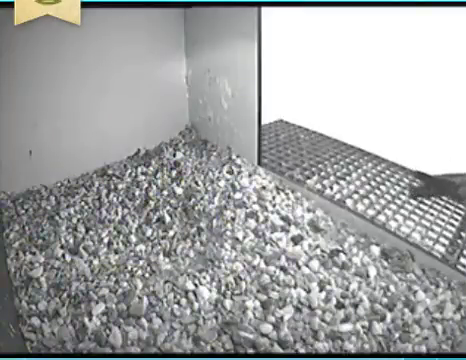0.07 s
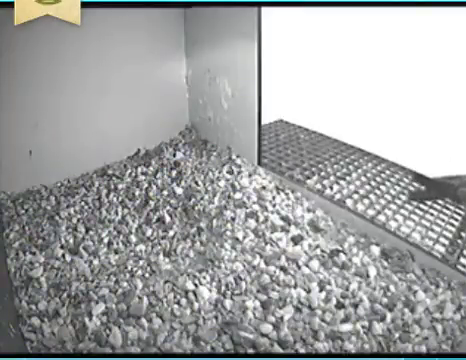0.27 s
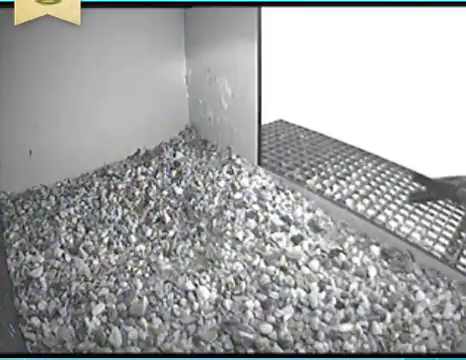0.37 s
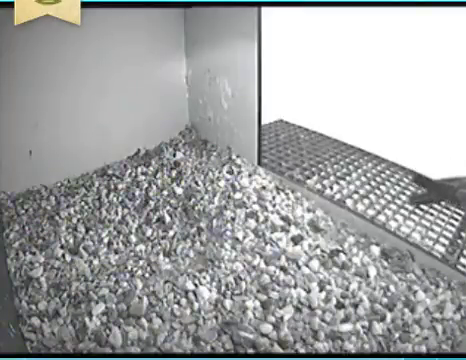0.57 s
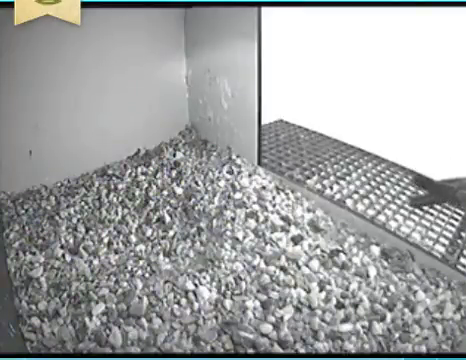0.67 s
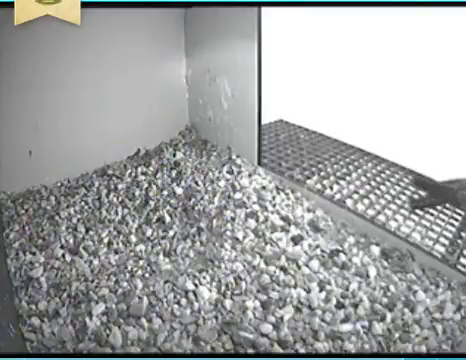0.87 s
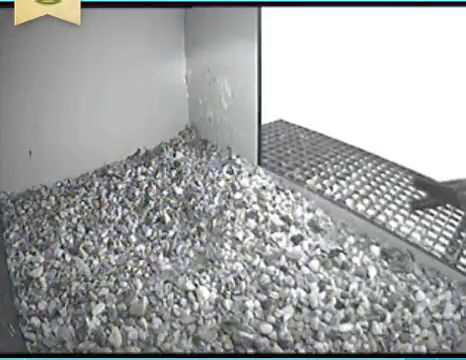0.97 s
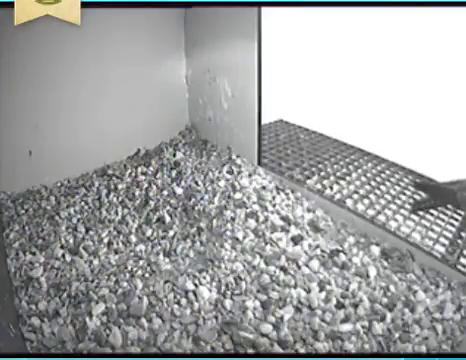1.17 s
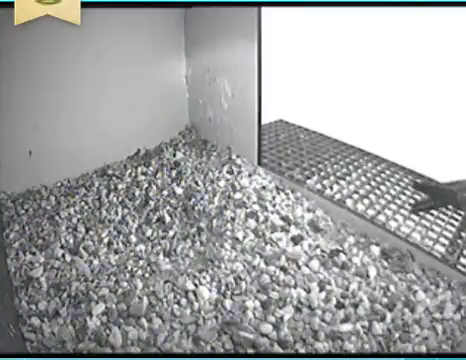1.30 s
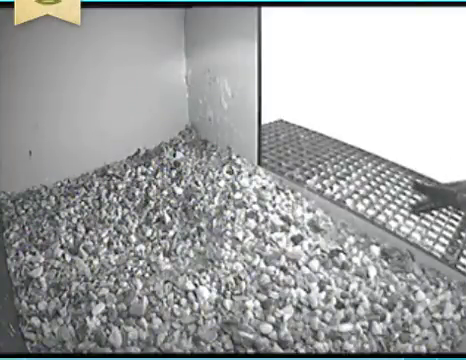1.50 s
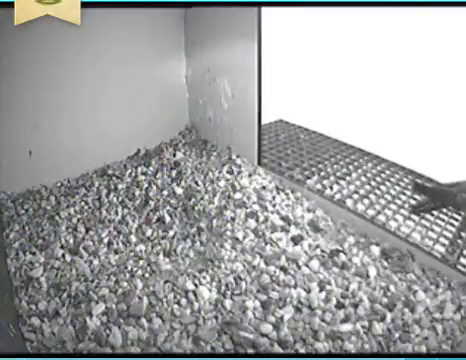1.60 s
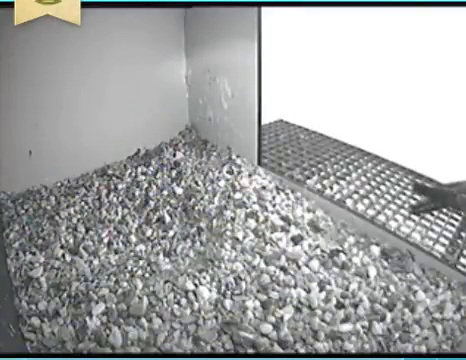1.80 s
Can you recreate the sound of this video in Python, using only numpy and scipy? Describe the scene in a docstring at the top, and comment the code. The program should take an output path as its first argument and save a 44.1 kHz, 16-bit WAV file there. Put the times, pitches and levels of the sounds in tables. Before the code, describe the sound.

A falcon gives one short, harsh cackle in a nest box over faint hum and hiss.

```python
"""A falcon gives one short, harsh cackle in a nest box: a rising squeak, a hoarse catch, then a loud
whistle that breaks downward through its registers and ends in a low cluck. Each register is an
unsteady gliding tone over raspy breath; faint tones linger briefly after the call, longest near
2.2 kHz. A faint outdoor rumble hums in the box's low resonances over an even hiss, and two soft
rustles come near the end."""
import sys
import numpy as np
from scipy import signal
from scipy.fft import rfft, irfft
from scipy.io import wavfile
from scipy.ndimage import uniform_filter1d

SR = 44100
rng = np.random.default_rng(int(sys.argv[2]) if len(sys.argv) > 2 else 0)


def generate_wav(signal):
    """Clip the signal to [-1, 1] and save it as 16-bit WAV at the path in sys.argv[1]."""
    frames = np.transpose(np.atleast_2d(signal))
    scaled = np.clip(frames, -1, 1) * 32767
    pcm = np.round(scaled).astype(np.int16)
    wavfile.write(sys.argv[1], SR, pcm)


N = 81585
TIME = np.arange(N) / SR


def from_db(db):
    """Decibels to gain."""
    return 10 ** (np.asarray(db) / 20)


def rms_one(x):
    """Scale to unit rms."""
    return x / np.sqrt(np.mean(x ** 2) + 1e-20)


def envelope(rows, fade_db_per_s=0):
    """Gain from a curve's first (t/s) and last (level/dB) columns; its ends hold or fade."""
    rows = np.array(rows)
    outside_s = np.abs(TIME - np.clip(TIME, rows[0, 0], rows[-1, 0]))
    fade_db = np.minimum(fade_db_per_s * outside_s, 200)
    return from_db(np.interp(TIME, rows[:, 0], rows[:, -1]) - fade_db)


def coloured(x, points):
    """Equalise a sound along a curve of f/Hz, gain/dB."""
    hz, db = np.transpose(points)
    bins = np.maximum(np.fft.rfftfreq(N, 1 / SR), 1)
    gain = from_db(np.interp(np.log(bins), np.log(hz), db))
    return irfft(rfft(x) * gain, N)


def noise(colour):
    """Coloured noise at unit rms."""
    return rms_one(coloured(rng.standard_normal(N), colour))


def drift(rate_hz):
    """Smooth random wander at unit rms."""
    r = np.exp(-2 * np.pi * rate_hz / SR)
    return rms_one(signal.lfilter([1], [1, -2 * r, r * r], rng.standard_normal(N + SR))[SR:])


def resonance(x, hz, width_hz):
    """Two-pole resonance with unity gain at its peak."""
    r = np.exp(-np.pi * width_hz / SR)
    feedback = [1, -2 * r * np.cos(2 * np.pi * hz / SR), r * r]
    return signal.lfilter(np.array([1, 0, -1]) * (1 - r * r) / 2, feedback, x + 1e-18)


def drone(hz, width_hz):
    """A wavering hum: noise passed twice through one resonance."""
    band = resonance(rng.standard_normal(N + SR), hz, width_hz)
    return rms_one(resonance(band, hz, width_hz)[SR:])


def box_hum():
    """Outdoor rumble caught in the low resonances of the box, slowly swelling."""
    # two groups of box resonances: f/Hz, width/Hz, level/dB
    low_modes = [(336.7, 41.7, 0.5), (372.8, 30.7, -2), (428.5, 21.5, -5), (475.2, 19, -7.5)]
    upper_modes = [(819, 52, 1.5), (884, 31, -6.5), (768, 77, -1.5)]
    # the swell of each group: t/s, level/dB
    low_swell = [(0, -47.5), (.2, -49.5), (.5, -47), (.66, -49.5), (.88, -48), (.97, -48.5), (1.07, -49),
                 (1.2, -44.5), (1.35, -47), (1.47, -46.5), (1.535, -40.5), (1.59, -39), (1.62, -43),
                 (1.68, -46), (1.75, -45), (1.79, -48.5), (1.82, -39), (1.85, -48)]
    upper_swell = [(0, -70), (.6, -67.5), (.8, -64), (1.0, -58.5), (1.25, -63.5), (1.55, -54),
                   (1.85, -55.5)]
    low = sum(from_db(db) * drone(hz, width) for hz, width, db in low_modes)
    low_rms = np.sqrt(uniform_filter1d(low ** 2, int(.06 * SR)) + 1e-12)  # over 60 ms, to even it out
    upper = rms_one(sum(from_db(db) * drone(hz, width) for hz, width, db in upper_modes))
    return envelope(low_swell) * low / low_rms + envelope(upper_swell) * upper


def hiss():
    """An even bed of distant air and microphone hiss."""
    # tone of the bed: f/Hz, level/dB
    colour = [(30, -25), (90, -18.5), (140, -8), (200, 4), (290, 14.5), (520, 15.5), (680, 10.5), (950, 7),
              (1300, 2.5), (2500, 2.5), (4200, 0.5), (6500, -2), (8500, -4), (10300, -11)]
    # its slight rise: t/s, level/dB
    rise = [(0, -53.5), (.6, -53), (1.3, -52.5), (1.6, -51.5), (1.85, -51)]
    return envelope(rise) * noise(colour)


def register(curve, overtones_db, jitter, shimmer_db):
    """One gliding tone with overtones; jitter (a share of the pitch) and shimmer roughen it."""
    times, hz, _ = np.transpose(curve)
    pitch = np.interp(TIME, times, hz) * (1 + jitter * drift(rate_hz=390))
    phase = 2 * np.pi * np.cumsum(pitch) / SR
    tone = sum(from_db(db + shimmer_db * drift(rate_hz=370)) * np.sin(harmonic * phase)
               for harmonic, db in enumerate([0, *overtones_db], start=1))
    return np.sqrt(2) * envelope(curve, fade_db_per_s=5002) * tone


def falcon():
    """The voice jumps from register to register over hoarse air in the throat."""
    # the glide of each register: t/s, f/Hz, level/dB
    squeak = [(.217, 3650, -60), (.2225, 3620, -27), (.226, 3396, -26.5), (.231, 3750, -30),
              (.237, 3763, -33.5), (.242, 4050, -31), (.247, 4000, -43), (.252, 3970, -54)]
    catch = [(.234, 1094, -71), (.241, 1176, -44.5), (.249, 1240, -37), (.255, 1295, -48.5),
             (.262, 1148, -40), (.269, 1120, -39), (.281, 1220, -65)]
    slur = [(.276, 3850, -50), (.280, 3805, -26.5), (.2835, 3435, -25), (.288, 3328, -25.5),
            (.292, 3235, -23), (.297, 3230, -35)]
    whistle = [(.290, 3200, -30), (.2925, 3194, -16), (.295, 3014, -18), (.2995, 3028, -14),
               (.302, 2980, -27), (.305, 2720, -28)]
    whistle_end = [(.300, 2900, -54), (.304, 2831, -25.5), (.310, 2766, -44), (.320, 2750, -40.5),
                   (.330, 2663, -43), (.336, 2670, -38), (.345, 2696, -33), (.350, 2620, -48)]
    voice_break = [(.301, 2203, -38), (.3035, 2157, -26), (.308, 2050, -22.5), (.312, 2101, -18.5),
                   (.319, 2057, -29), (.324, 1930, -32), (.331, 2014, -36), (.338, 1950, -52)]
    shrill = [(.303, 4080, -49), (.311, 4107, -38), (.317, 4040, -29), (.323, 4032, -33),
              (.339, 4040, -35.5), (.352, 4060, -53), (.368, 4100, -45.5), (.39, 3995, -53),
              (.42, 3990, -62)]
    croak = [(.323, 960, -59), (.329, 973, -32.5), (.334, 983, -28.5), (.339, 947.5, -44.5),
             (.345, 874, -38), (.353, 890, -53)]
    cluck = [(.330, 399.9, -67), (.334, 427.6, -19), (.339, 352.6, -24.5), (.344, 369, -12.5),
             (.350, 338, -19), (.356, 393, -28), (.361, 355, -51), (.372, 350, -43)]
    afternote = [(.360, 3200, -51), (.371, 3230, -38), (.379, 3080, -40.5), (.388, 3040, -62),
                 (.41, 2940, -65)]
    # push of the breath: t/s, level/dB
    breath = [(.198, -58), (.212, -42.5), (.226, -37.5), (.25, -37), (.275, -36.5), (.30, -35),
              (.322, -37.5), (.337, -30.5), (.35, -33.5), (.362, -49), (.385, -37.5)]
    # tone of the breath: f/Hz, level/dB
    breath_colour = [(40, -22), (160, -23), (250, -3), (380, 8.5), (750, -4.5), (1500, -5), (2300, 6.5),
                     (3200, 0), (4200, 3), (5500, -4.5), (7200, -16.5), (8100, -27.5), (9000, -15.5),
                     (10500, -33)]
    rasp = envelope(breath, fade_db_per_s=5002) * noise(breath_colour)
    voice = (register(squeak, [-22.5], jitter=.012, shimmer_db=1.4)
             + register(catch, [-10, -12, -15], jitter=.025, shimmer_db=2.2)
             + register(slur, [-20.5, -35.5], jitter=.016, shimmer_db=1.6)
             + register(whistle, [-32.5, -44], jitter=.0094, shimmer_db=.81)
             + register(whistle_end, [-9], jitter=.011, shimmer_db=1.5)
             + register(voice_break, [-27, -40, -34.5], jitter=.0067, shimmer_db=.62)
             + register(shrill, [-30.5], jitter=.0068, shimmer_db=1.8)
             + register(croak, [-8, 3, -12, -16, -18, -20], jitter=.010, shimmer_db=1.0)
             + register(cluck, [-24, -23, -28], jitter=.02, shimmer_db=.5)
             + register(afternote, [-20], jitter=.012, shimmer_db=3.4))
    low_cut = signal.butter(4, 284, "high", fs=SR, output="sos")
    return rasp + signal.sosfilt(low_cut, voice)


def call_tail(call):
    """A short diffuse wash and faint tones linger after the call, longest near 2.2 kHz."""
    # tones that hang on after the call: f/Hz, gain/dB, t60/s
    lingering_tones = [(372, -21, .14), (474.6, -3.5, 0.069), (1690, 7, 0.27), (2160, -1, 0.4),
                       (2815, -7.5, 0.12), (4010, -2.5, 0.16), (4070, 0.5, .16)]
    # colour of the wash: f/Hz, gain/dB
    wash_colour = [(200, -23.5), (400, -8.5), (1000, -8), (2200, -1.5), (3100, -9.5), (3650, 0.5),
                   (4500, -4.5), (7000, 9), (10000, -6.5)]
    wash_db, t60_s, build_s = -9, .31, .0098
    tail = rng.standard_normal(N) * from_db(-60 * TIME / t60_s) * (1 - np.exp(-TIME / build_s))
    wash = signal.fftconvolve(coloured(call, wash_colour), tail / np.linalg.norm(tail))[:N]
    tones = sum(from_db(db) * resonance(call, hz, np.log(1000) / (np.pi * t60))
                for hz, db, t60 in lingering_tones)
    return from_db(wash_db) * wash + tones


def rustles():
    """Two very soft rustles, each a brief bell-shaped swell of noise."""
    # the swells: t/s, half-width/s, level/dB
    swells = [(1.42, 0.027, -57.5), (1.61, .05, -59.5)]
    # their tone: f/Hz, level/dB
    colour = [(600, -20), (1500, -3), (2000, -1), (2800, -10), (4000, -7), (8000, -26)]
    gain = sum(from_db(db) * np.exp(-.5 * ((TIME - t) / width) ** 2) for t, width, db in swells)
    return gain * noise(colour)


def scene():
    """The call and its tail over the quiet bed, nearly mono with a little width in the mids."""
    # left-right difference: f/Hz, gain/dB
    side_colour = [(100, -62), (300, -40), (480, -31), (800, -21), (1300, -24.5), (2500, -52)]
    call = falcon()
    mid = call + call_tail(call) + box_hum() + hiss() + rustles()
    side = coloured(np.imag(signal.hilbert(mid)), side_colour)  # a quarter cycle behind the mid
    return mid + side * np.array([[1], [-1]])


def record(dry):
    """A steep high cut at 10.5 kHz."""
    return signal.sosfilt(signal.ellip(12, .1, 80, 10500, fs=SR, output="sos"), dry)


dry = scene()
out = record(dry)
generate_wav(out)
```